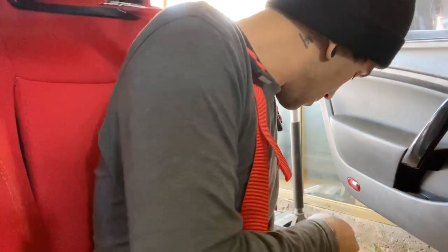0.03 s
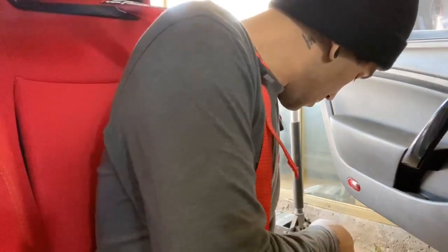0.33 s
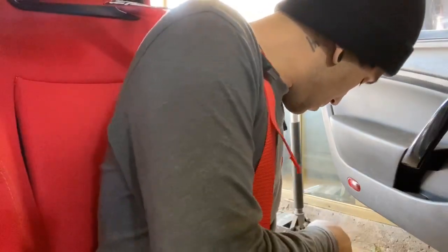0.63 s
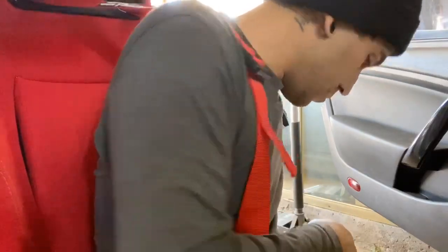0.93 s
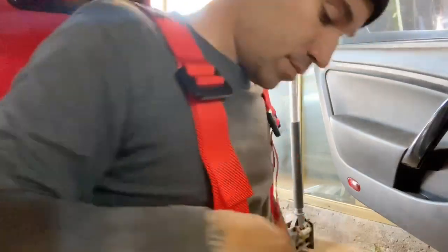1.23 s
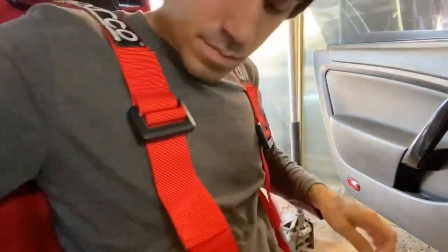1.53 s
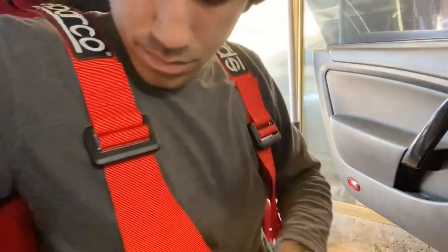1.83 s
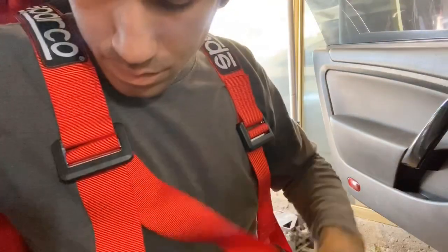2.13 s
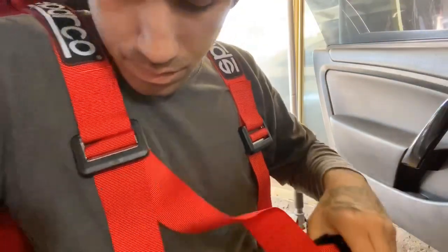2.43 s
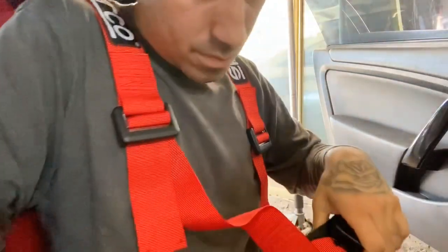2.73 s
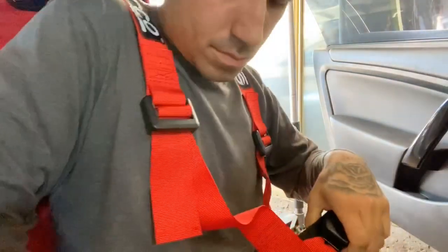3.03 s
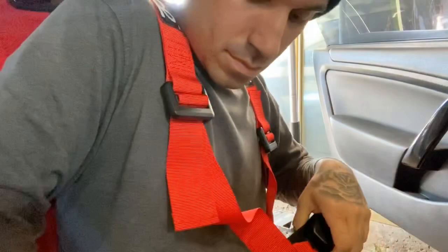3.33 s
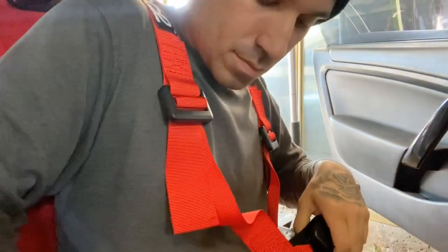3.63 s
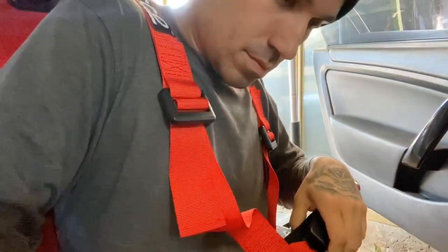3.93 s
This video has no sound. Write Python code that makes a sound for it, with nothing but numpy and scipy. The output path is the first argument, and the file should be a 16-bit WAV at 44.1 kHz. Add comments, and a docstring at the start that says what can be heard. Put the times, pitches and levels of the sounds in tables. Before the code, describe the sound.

One sharp, bright click of a harness buckle latching stands out in a parked car. Nearby, quiet cloth rustle and small taps lead up to it, and more rustling and dull bumps follow, with a faint outdoor rumble throughout.

```python
"""First comes a soft, low boom: the cabin of a parked car, its door open to a faint outdoor background.
Sleeves and webbing rustle as a seat harness is pulled together, and the buckle and strap adjuster knock.
Then the steel tongue (the flat tip that goes into the buckle) slides in with a short rising groan.
The catch scrapes over it and snaps shut, making the steel ring brightly."""
import sys
import numpy as np
from scipy import signal
from scipy.fft import rfft, irfft
from scipy.io import wavfile

SR = 44100
rng = np.random.default_rng(int(sys.argv[2]) if len(sys.argv) > 2 else 0)


def file_out(sig):
    """Save sig as 16-bit WAV at sys.argv[1]."""
    # one column per channel
    cols = np.atleast_2d(sig).T
    # limit, then scale
    lim = np.clip(cols, -1, 1)
    pcm = np.round(lim * 32767).astype(np.int16)
    wavfile.write(sys.argv[1], SR, pcm)


N = 176400
T = np.arange(N) / SR

# A colour is the strength of a noise at each pitch. A decay (t60) is the time to fade by 60 dB.
# colour of the outdoor background: f/Hz, level/dB
OUTDOOR_COLOUR = [(18, -31), (30, 2.5), (45, 2), (88, 7.5), (115, -4.5), (165, -2.5), (260, -12.5),
                  (450, -27), (1000, -24), (2500, -39), (7000, -56), (15000, -89)]
# loudness of the cabin boom: t/s, level/dB
BOOM_LEVELS = [(0, -40), (.2, -34.5), (.85, -45.5), (1.03, -29.5), (1.2, -39), (1.5, -33.5), (1.72, -29.5),
               (2.25, -34), (2.57, -35), (2.73, -27.5), (3.13, -37), (3.21, -27), (3.47, -38.5), (3.8, -25),
               (4, -51)]
# the body bumping the seat: t/s, level/dB
SEAT_BUMPS = [(0.768, -37), (2.12, -44), (3.184, -35.5), (3.542, -35.5)]
# colour of a bump: f/Hz, level/dB
BUMP_COLOUR = [(40, -17), (150, 8), (240, -9), (400, -20.5), (1000, -104)]
# loudness of sliding webbing and of rubbing sleeves: t/s, level/dB
WEBBING_LEVELS = [(.24, -72), (.3, -92), (.675, -73.5), (.7, -63.5), (1.02, -62), (1.2, -68), (1.55, -61),
                  (1.84, -57), (2.15, -56.5), (2.23, -74.5), (2.41, -59), (2.68, -66.5), (2.73, -50),
                  (2.8, -60), (2.94, -62.5), (3.2, -51), (3.24, -66.5), (3.32, -57.5), (3.66, -64),
                  (4, -59.5)]
SLEEVE_LEVELS = [(0, -62), (.98, -50.5), (1.15, -54.5), (1.79, -51), (1.86, -45.5), (2.1, -44.5),
                 (2.3, -55), (2.44, -46.5), (2.56, -51.5), (2.9, -48.5), (3.19, -44), (3.26, -52),
                 (3.35, -45.5), (3.5, -50), (4, -50)]
# their colours: f/Hz, level/dB
WEBBING_HISS = [(800, -24.5), (2000, 0), (4000, 6.5), (6000, 3.5), (8500, 6.5), (10500, -2), (14000, 1.5),
                (15500, -21)]
SLEEVE_RUSTLE = [(150, 5.5), (330, 1.5), (540, 0.5), (800, -3), (1150, -4.5), (2200, -9.5), (4000, -20),
                 (9000, -62)]
# single strokes of hand and strap: t/s, level/dB, hold/s, centre f/Hz
HAND_STROKES = [(0.768, -36, .014, 290), (2.405, -52, .08, 1050), (2.432, -42.5, .035, 470),
                (2.976, -41, .03, 420), (3.035, -44.5, .05, 500), (3.08, -53, .1, 2050),
                (3.19, -40, .02, 250), (3.546, -40, .035, 210)]
# taps of the strap adjuster: t/s, level/dB
ADJUSTER_TAPS = [(2.0695, -37.5), (2.146, -26.5), (2.187, -35), (2.598, -37)]
# small dry ticks: t/s, level/dB
METAL_TICKS = [(1.003, -47), (3.348, -45), (3.859, -45)]
# colour of a tick: f/Hz, level/dB
TICK_HISS = [(2000, -12), (6000, 0), (15000, -3)]
# ringing tones of the adjuster, a loose metal fitting and the buckle housing: f/Hz, level/dB, decay/s
ADJUSTER_TONES = [(1190, -1, .035), (1650, -7, .028), (3300, -11, .02), (4600, -14, .018)]
FITTING_TONES = [(7510, 0, .16), (7790, -1, .16), (8450, -4, .13), (9630, -10, .12)]
HOUSING_TONES = [(490, -4, .16), (770, -8, .12), (958, 0, .2), (1042, 0, .26), (1390, -6, .1),
                 (1690, -5, .1), (3468, -12, .1)]
# knocks of buckle and fittings: t/s, thud level/dB, clack level/dB, edge level/dB, decay/s
BUCKLE_KNOCKS = [(0.7545, -37, -38.5, -46, 0.075), (1.2888, -39, -63, -51, 0.16),
                 (1.812, -38.5, -43, -50, 0.06), (2.621, -34, -36.5, -53, 0.075),
                 (2.705, -40, -33.5, -38, 0.15), (2.729, -39, -34, -42, 0.11),
                 (3.309, -46, -43, -57, 0.074), (3.4287, -41, -42, -54, 0.034)]
# colours of a knock's low thud, middle clack and bright edge: f/Hz, level/dB
THUD_COLOUR = [(80, -14), (170, -4), (320, 0), (550, -2), (800, -9), (3000, -70)]
CLACK_COLOUR = [(300, -30), (700, -7), (1000, 0), (1300, -6), (1700, -4), (2400, -14), (15000, -80)]
EDGE_COLOUR = [(1000, -25), (2200, 0), (3600, 0), (4600, -8), (8000, -16), (15000, -27)]
# loudness of the tongue rubbing along its slot: t/s, level/dB
SLIDE_LEVELS = [(2.70, -80), (2.709, -33), (2.775, -38), (2.81, -60)]
# the catch's snap, then its bounce: t/s, level/dB, hold/s
LATCH_STRIKES = [(2.8111, -2.5, 0.017), (2.851, -7, 0.0019)]
# colour of the bright hiss heard at the snap, with a deep gap near 11 kHz: f/Hz, level/dB
SNAP_HISS = [(1200, -19), (3000, -22), (4900, -12.5), (7200, -8.5), (8900, -13), (10000, -19), (11000, -42),
             (11950, -1), (12600, -19), (15000, -25)]
# tones of the steel tongue: f/Hz, level/dB, decay/s; some add left minus right/dB, left phase lead/rad
TONGUE_TONES = [(1857, -26, .12), (2536, -26, .08), (3408, -20, .08), (3784, -22, .12),
                (4797, -8, .07, 8, .7), (5904, -9, .105, -3, -2), (6487, -10, .08, 4, -1.7),
                (6905, -17, .08), (7654, -19, .08), (8160, -1, .11, 0, .1), (9160, -20, .15, 0, 1.1),
                (9700, -22, .08), (12001, -2, .095, 1, -1.1), (13943, -15, .19, 0, 1.1)]

FLUTTER_HZ = 161  # how fast a loose contact trembles
SLIDE_START_S, SLIDE_END_S = SLIDE_LEVELS[0][0], SLIDE_LEVELS[-1][0]


def amp(db):
    """Turn decibels into a number to multiply by."""
    return 10 ** (np.asarray(db) / 20)


def unit(x):
    """Scale a signal so that its average power is 1."""
    return x / np.sqrt(np.mean(np.abs(x) ** 2))


def fader(curve):
    """A volume curve through (t/s, level/dB) points."""
    return amp(np.interp(T, *np.array(curve).T))


def walk(rate):
    """A smooth random wobble that changes about rate times a second."""
    f = np.arange(N // 2 + 1) * SR / N
    return unit(irfft(rfft(rng.standard_normal(N)) / (1 + (2 * f / rate) ** 4), N))


def flutter(rough, rate=FLUTTER_HZ):
    """A random tremble in a tone's strength and phase."""
    return unit(1 + rough * (walk(rate) + 1j * walk(rate)))


def noise(colour, wide_hz=325):
    """Stereo noise of a given colour; left and right are alike below wide_hz."""
    f = np.arange(1, N // 2 + 2) * SR / N
    hz, db = np.array(colour).T
    gain = amp(np.interp(np.log(f), np.log(hz), db))
    mid, side = rfft(rng.standard_normal((2, N))) * gain
    side = side * f / np.hypot(f, wide_hz)
    return unit(irfft(np.array([mid + side, mid - side]), N))


def blow(start, t60, attack=0.001, hold=0):
    """The volume curve of one hit: rise quickly, hold, fade. Times are in seconds."""
    out = np.zeros(N)
    span = slice(int(start * SR), int((start + hold + 2 * t60) * SR))
    age = T[span] - start
    out[span] = np.clip(age / attack, 0, 1) * np.exp(-np.log(1000) * np.maximum(age - hold, 0) / t60)
    return out


def ring(tones, strikes, rough):
    """An object rings with its own tones at each strike (t/s, level/dB, hold/s, pitch ratio)."""
    out = np.zeros((2, N))
    for hz, db, t60, *place in tones:
        tremble = flutter(rough) if rough else np.ones(N)
        pan_db, lead = place or (0, rng.standard_normal())
        sides = np.array([[amp(pan_db / 2)], [amp(-pan_db / 2) * np.exp(-1j * lead)]])
        for start, strike_db, hold, pitch in strikes:
            volume = blow(start, t60, hold=hold)
            on = volume > 0
            cycles = hz * pitch * (T[on] - start) + rng.random()
            wave = volume[on] * tremble[on] * np.exp(2j * np.pi * cycles)
            out[:, on] += np.sqrt(2) * amp(db + strike_db) * (sides * wave).imag
    return out


def outdoors(level_db=-39, wobble_db=2):
    """A faint outdoor rumble whose loudness wavers a little."""
    return amp(level_db + wobble_db * walk(20)) * noise(OUTDOOR_COLOUR)


def cabin(boom_hz=58.9, left_db=1.65):
    """The cabin booms unevenly at its lowest note and the seat is bumped, both louder on the left."""
    tone = flutter(rough=.79, rate=21.2) * np.exp(2j * np.pi * boom_hz * T)
    boom = np.sqrt(2) * tone.imag * fader(BOOM_LEVELS)
    bumps = sum(amp(db) * blow(s, t60=.54, attack=.0073, hold=.0073) for s, db in SEAT_BUMPS)
    return (boom + bumps * noise(BUMP_COLOUR)) * amp([[left_db / 2], [-left_db / 2]])


def cloth(grain_db=2, jerk_db=1.3):
    """Webbing and sleeves slide in small jerks, and the catching weave makes them sound grainy."""
    grain = unit(amp(grain_db * walk(700) + jerk_db * walk(41)))
    webbing = fader(WEBBING_LEVELS) * noise(WEBBING_HISS)
    sleeves = fader(SLEEVE_LEVELS) * noise(SLEEVE_RUSTLE)
    return grain * (webbing + sleeves)


def hand_rubs(grain_db=1, octave_drop_db=24):
    """Each stroke of hand and strap is a short, gritty swell of noise around one pitch."""
    grain = unit(amp(grain_db * walk(FLUTTER_HZ)))
    out = np.zeros((2, N))
    for s, db, hold, hz in HAND_STROKES:
        band = [(hz * 2 ** octave, -octave_drop_db * octave ** 2) for octave in np.linspace(-3, 3, 25)]
        out += amp(db) * blow(s, t60=.12, attack=.0068, hold=hold) * noise(band)
    return grain * out


def fittings(edge_db=-13, clink_s=3.694, clink_db=-54):
    """The strap adjuster taps; loose metal pieces tick and clink."""
    taps = ring(ADJUSTER_TONES, [(s, db, 0, 1) for s, db in ADJUSTER_TAPS], rough=.3)
    taps += noise(EDGE_COLOUR) * sum(amp(db + edge_db) * blow(s, t60=.031) for s, db in ADJUSTER_TAPS)
    ticks = noise(TICK_HISS) * sum(amp(db) * blow(s, t60=.025) for s, db in METAL_TICKS)
    clink = ring(FITTING_TONES, [(clink_s, clink_db, 0, 1)], rough=.15)
    return taps + ticks + clink


def buckle_knocks(housing_db=-7):
    """Knocks muffled by the hand; those made as the tongue goes in also ring the housing."""
    thud, clack, edge = noise(THUD_COLOUR), noise(CLACK_COLOUR), noise(EDGE_COLOUR)
    entering = [(s, clack_db + housing_db, 0, 1) for s, _, clack_db, _, _ in BUCKLE_KNOCKS
                if SLIDE_START_S < s < SLIDE_END_S]
    out = ring(HOUSING_TONES, entering, rough=.15)
    for s, thud_db, clack_db, edge_db, t60 in BUCKLE_KNOCKS:
        out += amp(thud_db) * thud * blow(s, t60, attack=.00066, hold=.013)
        out += (amp(clack_db) * clack + amp(edge_db) * edge) * blow(s, t60, attack=.00033, hold=.00092)
    return out


def tongue_slide(start_hz=400, rise_hz_per_s=3000):
    """The tongue rubs along its slot, squeezing a short groan upwards in pitch."""
    hz = start_hz + rise_hz_per_s * (np.clip(T, SLIDE_START_S, SLIDE_END_S) - SLIDE_START_S)
    groan = flutter(rough=.4) * np.exp(2j * np.pi * np.cumsum(hz) / SR)
    sliding = (T > SLIDE_START_S) & (T < SLIDE_END_S)
    return fader(SLIDE_LEVELS) * sliding * groan.imag


def springs_and_plates(count=44, low_hz=1800, high_hz=10200, jangle_db=-39):
    """The snap shakes the buckle's small parts: many weak, short tones, coloured like its hiss."""
    offset, length = rng.random((count, 2)).T
    hz = low_hz + (high_hz - low_hz) * (np.arange(count) + offset) / count
    levels = np.interp(hz, *np.array(SNAP_HISS).T)
    decays = .13 * (.5 + length)
    start, db, hold = LATCH_STRIKES[0]
    return ring(zip(hz, levels, decays), [(start, jangle_db + db, hold, 1)], rough=0)


def latch(tongue_db=-23.5, hiss_db=-28, grain_db=.5, seated_pitch=1.005):
    """The catch scrapes and snaps, ringing the tongue; its bounce rings the seated tongue a bit higher."""
    start, snap_db, scrape_s = LATCH_STRIKES[0]
    grain = unit(amp(grain_db * walk(1200)))
    strikes = [(s, tongue_db + db, hold, seated_pitch if k else 1)
               for k, (s, db, hold) in enumerate(LATCH_STRIKES)]
    steel = ring(TONGUE_TONES, strikes, rough=.15)
    hiss = blow(start, t60=.1, hold=scrape_s) * grain * noise(SNAP_HISS)
    return steel + amp(hiss_db + snap_db) * hiss


def scene():
    """Add the buckle and the handling of the harness to the outdoors and the cabin."""
    background = outdoors()
    buckle = latch() + springs_and_plates() + tongue_slide() + buckle_knocks()
    handling = fittings() + cloth() + hand_rubs()
    return background + cabin() + handling + buckle


def record(dry, top_hz=15000):
    """Cut away the very highest treble."""
    return signal.sosfilt(signal.ellip(8, .2, 80, top_hz, fs=SR, output="sos"), dry)


dry = scene()
out = record(dry)
file_out(out)
```